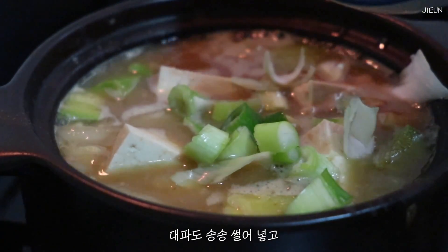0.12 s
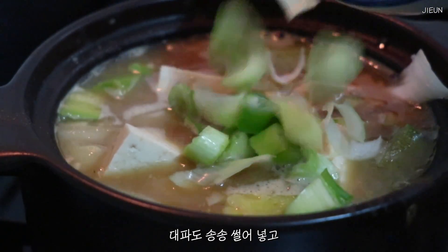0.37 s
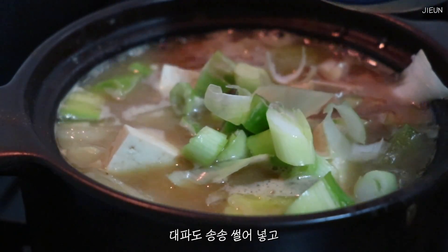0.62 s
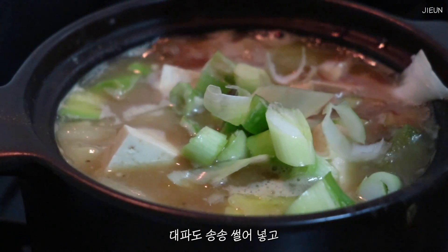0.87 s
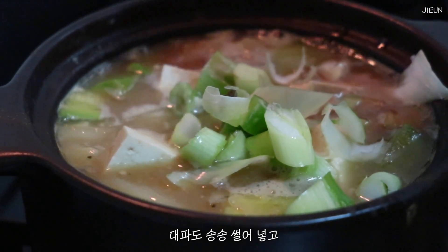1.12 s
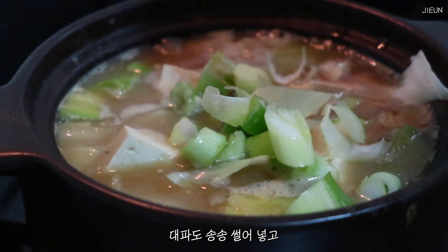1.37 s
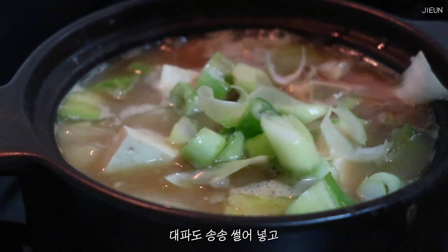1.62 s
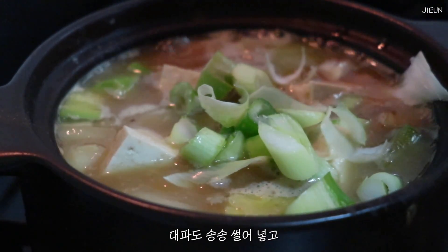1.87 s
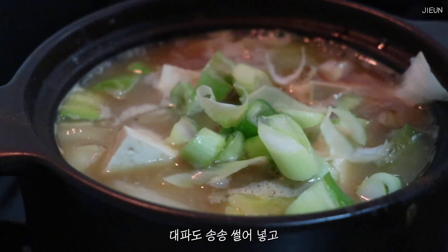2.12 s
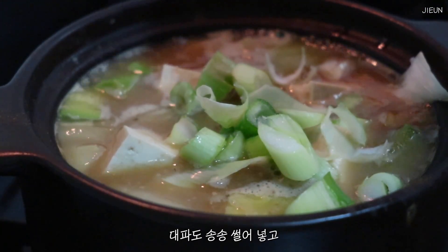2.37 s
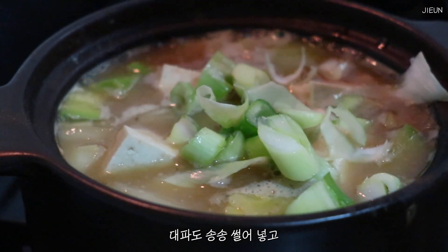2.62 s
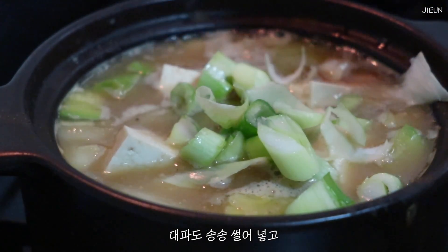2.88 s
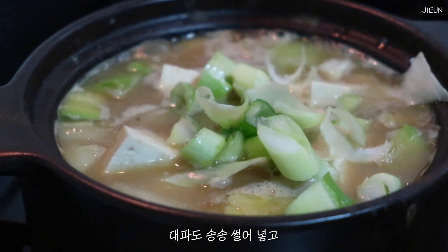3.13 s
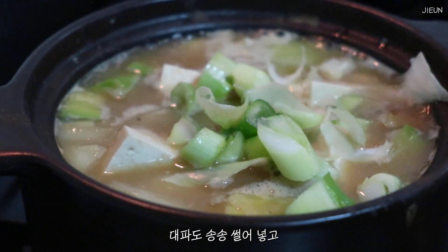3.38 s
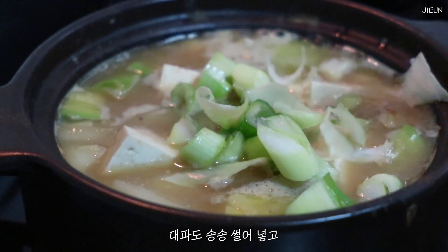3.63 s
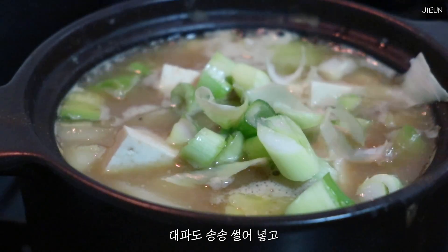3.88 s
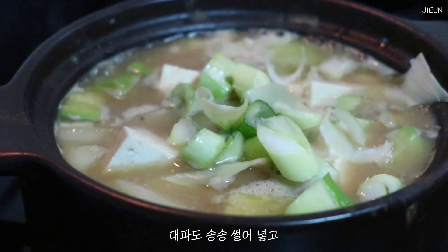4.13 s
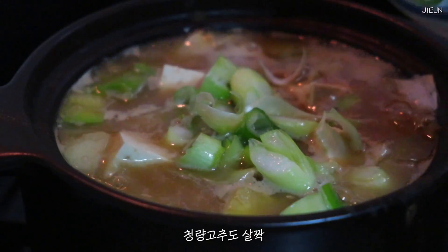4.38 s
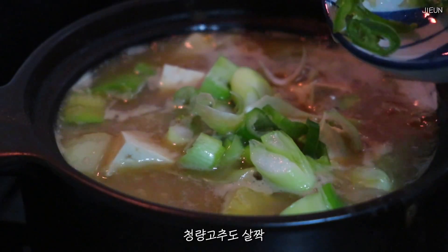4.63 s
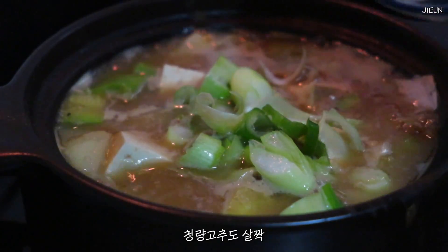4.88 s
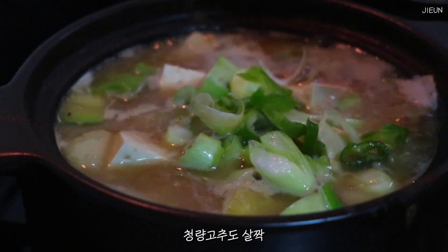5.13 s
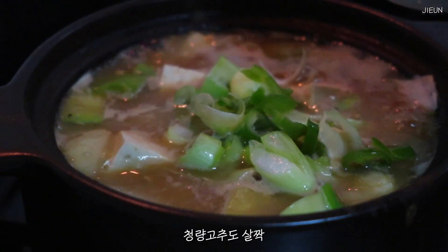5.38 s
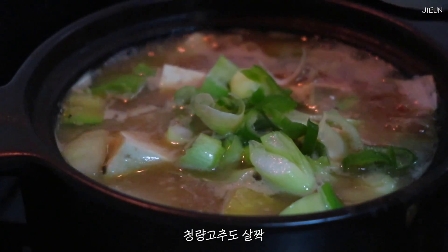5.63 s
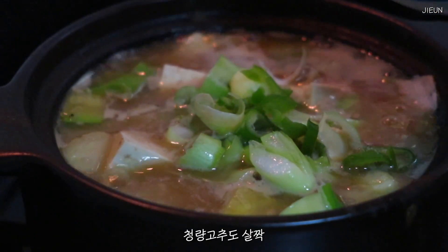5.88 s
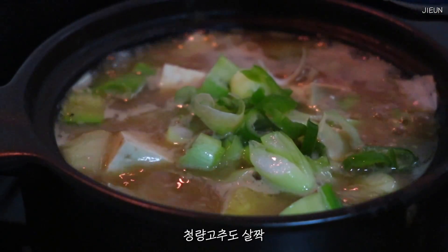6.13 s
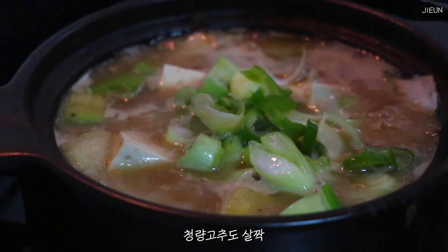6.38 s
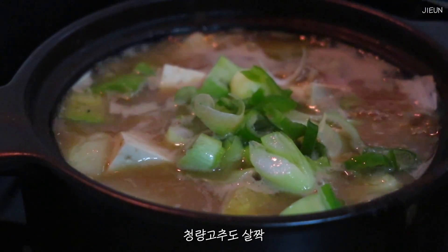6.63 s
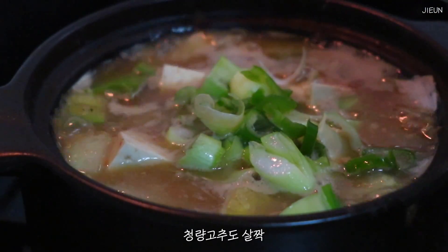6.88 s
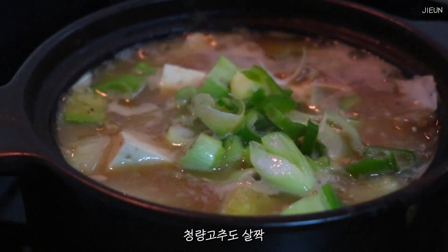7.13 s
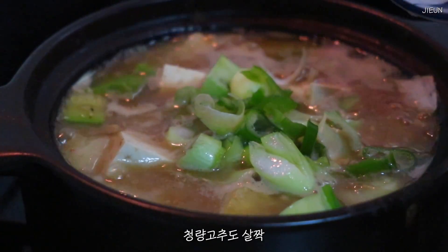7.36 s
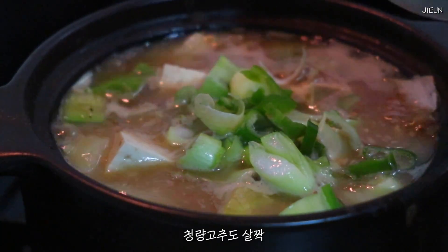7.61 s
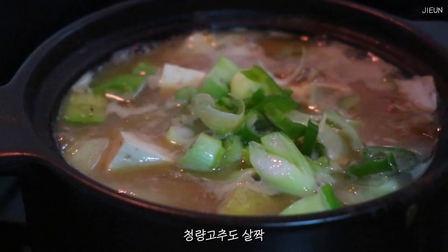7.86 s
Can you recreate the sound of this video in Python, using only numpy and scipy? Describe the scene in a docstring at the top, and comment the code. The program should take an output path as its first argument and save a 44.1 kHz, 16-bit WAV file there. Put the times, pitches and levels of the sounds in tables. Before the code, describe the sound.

In a small kitchen, a clay pot of stew seethes over a hissing gas flame, with a low fan rumble beneath. Close, short taps of chopsticks on a ceramic bowl come at uneven intervals, some faint, some sharp, with brief scrapes. Around the middle the background abruptly turns duller and more bubbly, then the taps resume, loudest in the later part. Close stereo microphone, little echo.

```python
"""Chopsticks tap and scrape a ceramic bowl: decaying bowl modes struck by clustered touches, and rough noise.
Below it a gas flame hisses round a clay pot (fluttering noise through resonances), the stew seethes (tiny
bursts), a fan rumbles and whines (filtered noise, wavering tones). A small kitchen echoes the taps.
Hiss, seething and rumble step to new levels near 4.33 s. Two close ports feed a gain control that ducks
on peaks."""
import sys
import numpy as np
from scipy import signal
from scipy.fft import rfft, irfft, next_fast_len
from scipy.io import wavfile

SR = 44100
rng = np.random.default_rng(int(sys.argv[2]) if len(sys.argv) > 2 else 0)


def rack_gain(trim_db):
    """Turn a fader trim in dB into the linear factor to multiply a signal by."""
    fader = np.asarray(trim_db, float)
    return 10 ** (fader / 20)


def wrap_up_sound(samples):
    """Save the sound to the file named by the first command line argument, as 16-bit audio."""
    columns = np.atleast_2d(samples).T
    # keep every value between -1 and 1, then stretch to whole-number steps
    tamed = np.clip(columns, -1, 1)
    steps = np.round(tamed * 32767).astype(np.int16)
    wavfile.write(sys.argv[1], SR, steps)


N = 352603
FFT_SIZE = next_fast_len(N)

# Spectrum and resonance levels are relative: at_ports() scales the in-phase part to unit rms.
# Chopstick taps, peak before the high-pass; hardness of contact sets the treble:
# time_s, peak_db, favoured_hz, low_body_db, treble_db (from 7 kHz up)
TAPS = [(0.1885, -12.5, 2170, -7.5, -17.5), (0.7413, -20, 2080, -8, -28), (1.3608, -11.5, 2780, -15, -18),
        (1.5349, -19.5, 3100, -7, -42), (1.922, -24.5, 2335, -10.5, -52), (1.9972, -28, 3000, -13, -26),
        (2.4984, -12, 3000, -18.5, -28), (2.8789, -8.5, 2730, -20, -12), (3.0389, -22.5, 2090, 1.5, 8.5),
        (4.7494, -19, 2210, -8, -17), (4.844, -10.5, 2940, -30, -16), (5.3184, -9.5, 3100, -25, -15),
        (5.673, -23, 3100, -25, -1), (5.6779, -19, 3300, -9, -10), (6.2613, -6.5, 2860, -16, -14),
        (6.62, -3.5, 3430, -24.5, -13.5), (7.2413, -16, 2270, -12.5, -42), (7.5856, -23.5, 3040, -6.5, 3)]
# Bowl modes, relative levels: mode_hz, in_phase_db, out_of_phase_db, t60_s
BOWL_MODES = [(628, -1, -36, 0.021), (870, -8, -2, 0.02), (1090, -3.5, -5, 0.034), (1258, 2, -17, 0.042),
              (1590, 2, -30, 0.052), (1693, 2.5, 11.5, 0.033), (2102, 9.5, -22, 0.026),
              (2336, 7.5, 0, 0.02), (2476, 22.5, 18, 0.0025), (2350, -4, 11, 0.026), (2915, 8.5, -3, 0.017),
              (3100, -9.5, -21, 0.024), (3107, -4, 2, 0.031), (3720, 3, 6.5, 0.011),
              (3807, 5.5, -16, 0.0091), (4970, 3, -15, 0.015), (5770, 1, 9.5, 0.012), (6450, 2, -4, 0.01),
              (7160, -6, 6, 0.033), (7230, 0.5, -46, 0.013), (8270, -0.5, 7, 0.011),
              (8870, -2, 10.5, 0.0094), (10380, -5, -8, 0.021), (11400, -18, -41, 0.0057),
              (12000, -22, 10, 0.0061), (14800, -22, -19, 0.0029)]
# Touches within a tap (stick skids, lands, bounces): delay_s, level_db
TOUCHES = [(-.003, -24), (-.0007, -17), (.0004, 0), (.0017, -13)]
# Stick slides on the glaze: start_s, end_s, level_db
SCRAPES = [(6.585, 6.63, -44.5), (3.03, 3.07, -43.5), (7.575, 7.62, -48)]
# Scrape spectrum: freq_hz, density_db (per Hz)
SCRAPE_SPECTRUM = [(1000, -1), (2500, 2), (5000, 1.5), (9000, -11), (16000, -16)]
# Simmer course: time_s, hiss_db, brightness_db_per_octave, seethe_db
SIMMER = [(0.0, -46.5, 3.5, -59.5), (0.599, -49, 1.5, -67.5), (1.1, -48, 5, -62.5), (1.45, -49.5, 2.5, -66),
          (1.75, -46.5, 3.5, -66), (2.4, -47.5, 0.5, -62.5), (3.1, -48, 3.5, -59.5), (3.4, -47, 3.5, -63),
          (3.9, -46.5, 4, -58), (4.325, -46, 2, -70), (4.335, -51, -4.5, -54.5), (5.1, -47.5, -1, -56),
          (5.55, -50.5, -0.5, -56.5), (6.0, -48.5, -2, -55.5), (6.9, -49.5, -0.5, -55),
          (7.3, -51, -0.5, -58.5), (8.0, -48.5, 2.5, -54.5)]
# Flame hiss, in phase and out of phase at the ports: freq_hz, density_db (per Hz)
HISS_IN_PHASE = [(2400, -20), (3000, -14.5), (3600, -5.5), (4500, -5.5), (5500, -8), (6500, -7),
                 (7500, -19.5), (8500, -22), (10000, -33.5), (13000, -40), (16000, -40)]
HISS_OUT_OF_PHASE = [(2400, -27.5), (3000, -8), (3600, -5.5), (4500, -4.5), (5500, -2.5), (6500, -11),
                     (7500, -13), (8500, -18), (10000, -22), (13000, -42.5), (16000, -58)]
# Resonances of the hollows round the pot, in phase and out of phase: centre_hz, width_hz, gain_db
HOLLOWS_IN_PHASE = [(3200, 60, 11.5), (3558, 42, 8.5), (4380, 41, 12), (4573, 79, 9.5), (4800, 65, -1.5),
                    (5394, 71, 10), (5540, 110, 9), (6230, 66, 12), (6513, 62, 9.5), (6970, 85, 3.5),
                    (7774, 160, 11.5), (6140, 200, -7), (4500, 110, -2), (3000, 170, -21), (5740, 110, 5.5),
                    (8090, 190, -6)]
HOLLOWS_OUT_OF_PHASE = [(3630, 85, 3), (3880, 160, 11), (4100, 93, 2.3), (4500, 100, 6.1), (4750, 62, 6.5),
                        (6040, 120, 7.6), (7600, 170, 5.6), (8700, 300, 3)]
# Stew seething spectrum: freq_hz, density_db (per Hz)
SEETHE_SPECTRUM = [(500, -18), (900, -8), (1500, -1), (2000, 2), (2700, -2.5), (3300, -4), (4000, -20),
                   (6000, -28.5)]
# Resonances of the seething: centre_hz, width_hz, gain_db
SEETHE_RESONANCES = [(2053, 90, 5.5), (2390, 61, 7), (2658, 34, 11), (2280, 70, -15), (1620, 410, -17.5)]
# Rumble of fan and flame in the room: freq_hz, density_db (per Hz)
RUMBLE_SPECTRUM = [(15, -0.5), (40, -2), (100, -7), (250, -6), (450, -6), (520, -15.5), (800, -17.5),
                   (1500, -28), (3000, -43.5)]
# Room resonances: centre_hz, width_hz, gain_db
ROOM_MODES = [(27.8, 12, 4), (44, 10, -4.5), (59.4, 6.8, 12), (109.2, 10.5, 9), (138.6, 6.8, 9.5),
              (191.9, 24, 14), (276.5, 19, 11), (418.7, 51, 9.5), (642, 69, 8)]
# Out-of-phase rumble relative to in-phase: freq_hz, gain_db
RUMBLE_OUT_OF_PHASE = [(25, -36), (60, -41), (130, -29), (290, -10), (640, -9), (1400, 6), (3000, 11)]
# Rumble level before and after the step at 4.33 s: level_db
RUMBLE_DB = [-49.5, -50]
# Fan motor tones, mean of the ports before wavering: tone_hz, level_db (rms)
WHINE = [(591, -64), (738, -74.5), (887, -74.5), (1180, -75.5)]


def rms_one(x):
    """Scale to unit rms."""
    return x / np.sqrt(np.mean(x ** 2) + 1e-20)


def drift(rate_hz):
    """Slow random curve of unit rms: noise through a double pole at rate_hz, made at SR / 40."""
    pole = np.exp(-2 * np.pi * rate_hz * 40 / SR)
    noise = rng.standard_normal(N // 40 + 2002)
    slow = signal.lfilter([1], [1, -2 * pole, pole * pole], noise)[2000:]   # drop the settling
    return np.interp(np.arange(N) / 40, np.arange(len(slow)), rms_one(slow))


def shape(spectrum, resonances=()):
    """Gain at every FFT frequency: smooth spectrum plus bell-shaped peaks and dips in dB."""
    hz = np.arange(FFT_SIZE // 2 + 1) * SR / FFT_SIZE + 1e-3
    point_hz, point_db = np.transpose(spectrum)
    db = np.interp(np.log(hz), np.log(point_hz), point_db)
    for centre_hz, width_hz, gain_db in resonances:
        db += gain_db / (1 + (2 * (hz - centre_hz) / width_hz) ** 2)
    return rack_gain(db)


def at_ports(source, in_phase, out_of_phase, shared):
    """Left and right; the out-of-phase part is part source in quadrature, part diffuse noise."""
    direct = rfft(rms_one(source), FFT_SIZE)
    diffuse = rfft(rng.standard_normal(N), FFT_SIZE)
    mid = irfft(in_phase * direct, FFT_SIZE)[:N]
    mixed = 1j * shared * direct + np.sqrt(1 - shared ** 2) * diffuse
    side = irfft(out_of_phase * mixed, FFT_SIZE)[:N]
    return np.array([mid + side, mid - side]) / np.sqrt(np.mean(mid ** 2))


def tap_tint_db(hz, favoured_hz, low_body_db, treble_db):
    """Mode weighting: 25.5 dB per octave fall below the favoured pitch to a floor, hardness slope above."""
    octaves = np.log2(hz / favoured_hz)
    below_db = np.maximum(25.5 * octaves, low_body_db)
    toward_treble = np.clip(octaves / np.log2(7000 / favoured_hz), 0, 1)
    return np.where(octaves < 0, below_db, treble_db * toward_treble ** 0.71)


def chopsticks():
    """Each touch strikes all bowl modes, which decay exponentially; strengths vary touch to touch."""
    hz, in_phase_db, out_of_phase_db, t60_s = np.transpose(BOWL_MODES)[:, :, None]
    ring_size = SR // 8
    t = np.arange(ring_size) / SR
    ring = rack_gain(-60 * t / np.maximum(t60_s, .001)) * np.exp(2j * np.pi * hz * t)
    ring *= (-1) ** np.arange(len(BOWL_MODES))[:, None]   # neighbours swing opposite ways
    ring *= (1 - np.exp(-t / .0001)) ** 2   # soft wood contact
    scatter_db = 3.6 * rng.standard_normal((len(TAPS), len(TOUCHES), 2, len(BOWL_MODES), 1))
    first_s = TOUCHES[0][0]
    out = np.zeros((2, N + SR))
    for (time_s, peak_db, favoured_hz, low_body_db, treble_db), tap_scatter_db in zip(TAPS, scatter_db):
        tint_db = tap_tint_db(hz, favoured_hz, low_body_db, treble_db)
        tap = np.zeros((2, ring_size + SR // 50))
        for (delay_s, touch_db), (mid_db, side_db) in zip(TOUCHES, tap_scatter_db):
            strike_db = touch_db + tint_db
            mid = (rack_gain(strike_db + in_phase_db + mid_db) * ring.imag).sum(axis=0)
            side = (rack_gain(strike_db + out_of_phase_db + side_db) * ring.real).sum(axis=0)   # in quadrature
            at = round((delay_s - first_s) * SR)
            tap[:, at:at + ring_size] += [mid + side, mid - side]
        at = round((time_s + first_s) * SR)
        out[:, at:at + tap.shape[1]] += rack_gain(peak_db) * tap / np.abs(tap.mean(axis=0)).max()
    high_pass = signal.butter(3, 550.0, "high", fs=SR, output="sos")
    return signal.sosfilt(high_pass, out[:, :N])


def kitchen(x):
    """Room echo: twenty feedback delays a side, duller on every round."""
    t60_s, wall_pole_hz, size = 0.32, 2900, 2 ** 15   # t60 at the lowest frequencies
    step = -2j * np.pi * np.arange(size // 2 + 1) / size
    dull = np.exp(-2 * np.pi * wall_pole_hz / SR)
    wall = (1 - dull) / (1 - dull * np.exp(step))
    echo = np.zeros((2, len(step)), complex)
    lags = (rng.uniform(.003, .03, 40) * SR).astype(int)
    for k, lag in enumerate(lags):
        loop = rack_gain(-60 * lag / SR / t60_s) * np.sqrt(wall) * np.exp(step * lag)
        echo[k % 2] += (-1) ** (k // 2) * loop / (1 - loop)
    return signal.oaconvolve(x, irfft(echo, size), axes=1)[:, :N]


def scrapes():
    """Stick friction: rough bright noise that swells and fades within each slide."""
    t = np.arange(N) / SR
    stroke = np.zeros(N)
    for start_s, end_s, level_db in SCRAPES:
        progress = np.clip((t - start_s) / (end_s - start_s), 0, 1)
        stroke += rack_gain(level_db) * np.maximum(np.sin(np.pi * progress), 0) ** .5
    colour = shape(SCRAPE_SPECTRUM)
    grit = rng.standard_normal(N) * rack_gain(2.5 * drift(200.0))
    return stroke * at_ports(grit, colour, rack_gain(-3.5) * colour, shared=0.91)


def flame(hiss_db, brightness_db_per_octave):
    """Turbulent gas jets: fluttering noise through the hollows, tilted about 5 kHz, bands wandering apart."""
    jets = rng.standard_normal(N) * rack_gain(1.0 * drift(13.7) + 0.95 * drift(49.0))
    in_phase = shape(HISS_IN_PHASE, HOLLOWS_IN_PHASE)
    out_of_phase = shape(HISS_OUT_OF_PHASE, HOLLOWS_OUT_OF_PHASE)
    hiss = at_ports(jets, in_phase, out_of_phase, shared=0.46)
    # hot air in the hollows wavers: all pitches wander together by about 0.5 %
    read = np.cumsum(1 + .005 * drift(.8))
    hiss = [np.interp(read * (N - 1) / read[-1], np.arange(N), port) for port in hiss]
    spectrum = rfft(hiss, FFT_SIZE)
    octaves = np.log2(np.arange(FFT_SIZE // 2 + 1) * SR / FFT_SIZE / 5000 + 1e-9)
    centres = np.linspace(-.7, .7, 15)   # octaves from 5 kHz; the end bands take all beyond
    out = np.zeros((2, N))
    for k, centre in enumerate(centres):
        weight = np.interp(octaves, centres, np.arange(len(centres)) == k)
        band = irfft(spectrum * weight, FFT_SIZE)[:, :N]
        out += band * rack_gain(brightness_db_per_octave * centre + 1.75 * drift(1.0) + 1.8 * drift(9.8))
    return rack_gain(hiss_db) * out


def stew(seethe_db):
    """Dense tiny bubble bursts of uneven size merge to a grainy seething."""
    sizes = rack_gain(2.0 * np.minimum(rng.exponential(1, N), 5)) * rng.choice([-1, 1], N)
    bursts_per_s = 4000.0 * rack_gain(3.0 * drift(8.0))
    bursts = sizes * (rng.random(N) < bursts_per_s / SR)
    colour = shape(SEETHE_SPECTRUM, SEETHE_RESONANCES)
    return rack_gain(seethe_db) * at_ports(bursts, colour, rack_gain(-3.5) * colour, shared=0.56)


def fan(rumble_db):
    """Noise rumble through the room resonances, plus motor tones wavering in pitch and level."""
    colour = shape(RUMBLE_SPECTRUM, ROOM_MODES)
    opposed = colour * shape(RUMBLE_OUT_OF_PHASE)
    out = rack_gain(rumble_db) * at_ports(rng.standard_normal(N), colour, opposed, shared=.3)
    upper = signal.sosfilt(signal.butter(2, 170.0, "high", fs=SR, output="sos"), out)
    out += [[-.09], [.09]] * upper   # fan a little to the right; deepest rumble has no direction
    lead_rad = np.array([[.25], [-.25]])
    for tone_hz, level_db in WHINE:
        turns = np.cumsum(tone_hz * (1 + 0.001977 * drift(1.525))) / SR
        port_db = level_db + 1.2 * drift(2.5) + [[-.7], [.7]]
        out += np.sqrt(2) * rack_gain(port_db) * np.sin(2 * np.pi * turns + lead_rad)
    return out


def scene():
    """Sum of all sources at the two ports."""
    t = np.arange(N) / SR
    time_s, *columns = np.transpose(SIMMER)
    hiss_db, brightness_db_per_octave, seethe_db = [np.interp(t, time_s, c) for c in columns]
    rumble_db = np.where(t < 4.33, *RUMBLE_DB) + 1.23 * drift(3.5)
    taps = chopsticks()
    bowl = taps + rack_gain(-24) * kitchen(taps) + scrapes()
    return bowl + flame(hiss_db, brightness_db_per_octave) + stew(seethe_db) + fan(rumble_db)


def band_limit(x):
    """A steep low-pass at the top of the band."""
    return signal.sosfilt(signal.butter(12, 16300, fs=SR, output="sos"), x)


def record(dry):
    """Gain control ducks on peaks, recovering at a steady dB rate before smoothing; converter flattens peaks."""
    threshold_db, cut_db_per_db, release_db_per_s, smoothing_s = -18.0, 0.4737, 15.5, 0.09
    ceiling = .37
    level_db = 20 * np.log10(np.abs(dry).max(axis=0) + 1e-9)
    wanted_db = np.maximum(level_db - threshold_db, 0) * cut_db_per_db
    ramp_db = release_db_per_s * np.arange(N) / SR
    duck_db = np.maximum.accumulate(wanted_db + ramp_db) - ramp_db
    pole = np.exp(-1 / (smoothing_s * SR))
    ducked = dry * rack_gain(-signal.lfilter([1 - pole], [1, -pole], duck_db))
    flattened = ducked / (1 + (ducked / ceiling) ** 4) ** .25
    low_pass = signal.cheby2(10, 60, 16300, fs=SR, output="sos")   # 60 dB down from 16.3 kHz
    return band_limit(signal.sosfilt(low_pass, flattened))


dry = scene()
out = record(dry)
wrap_up_sound(out)
```